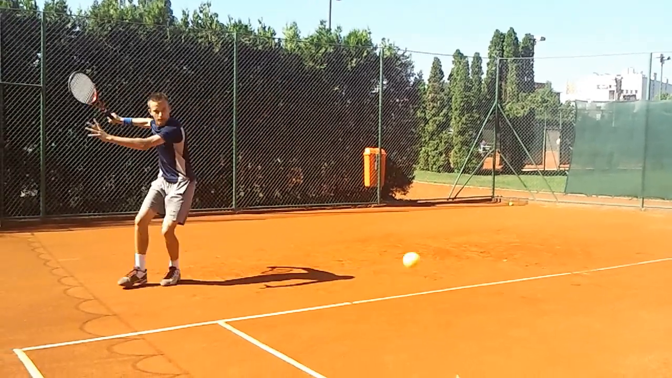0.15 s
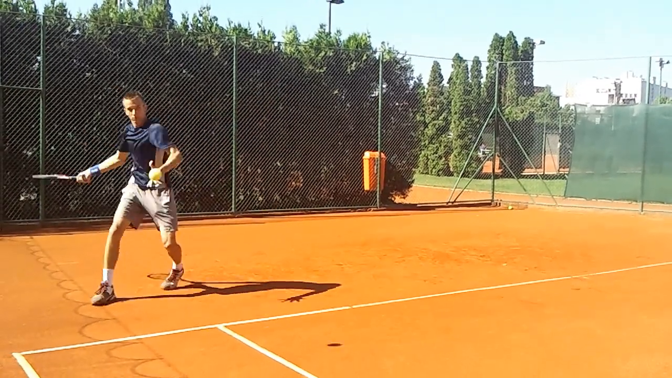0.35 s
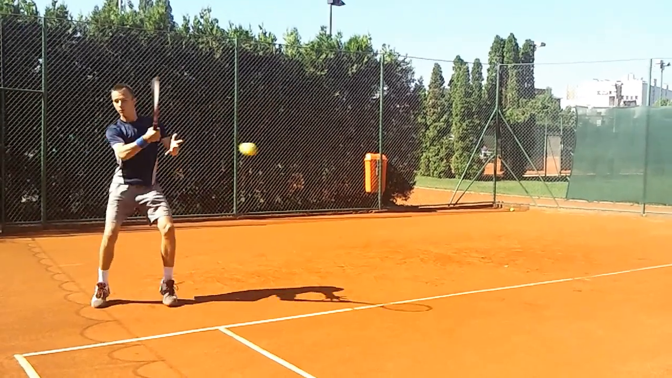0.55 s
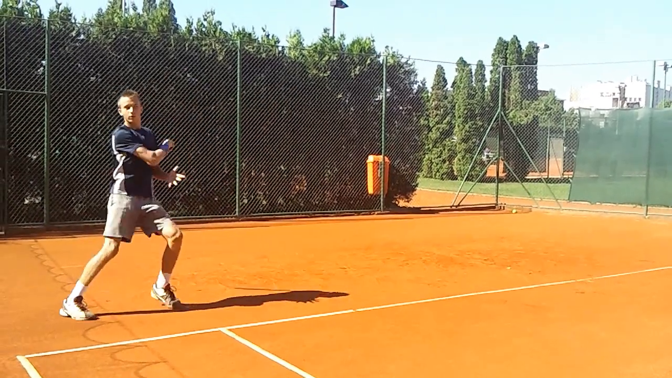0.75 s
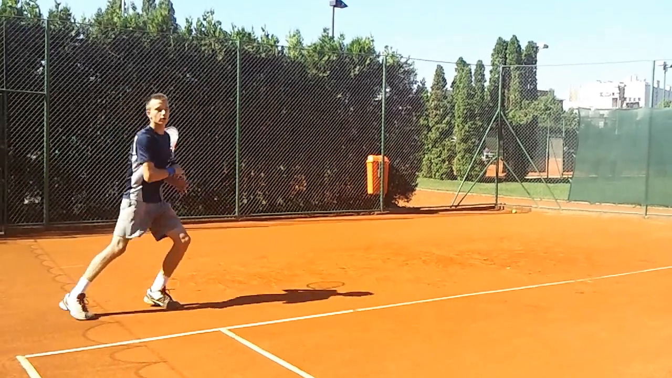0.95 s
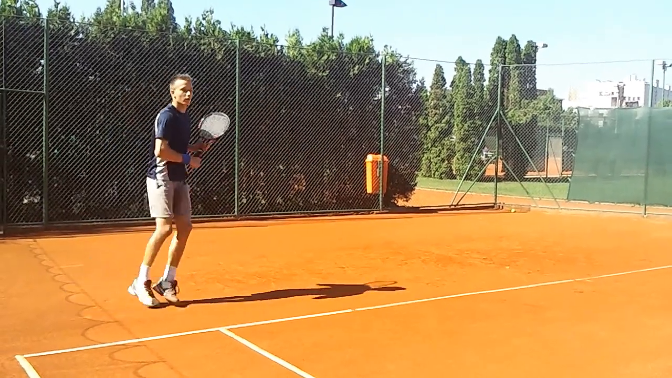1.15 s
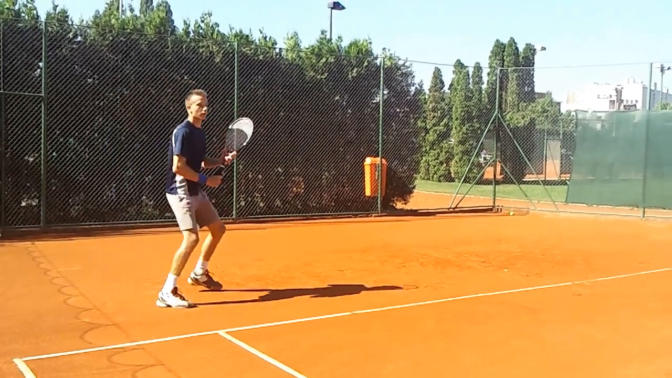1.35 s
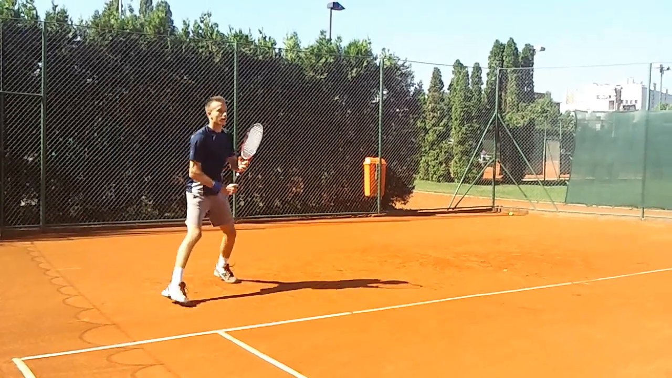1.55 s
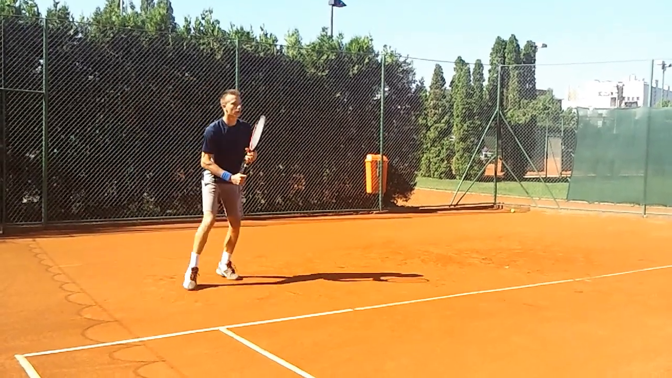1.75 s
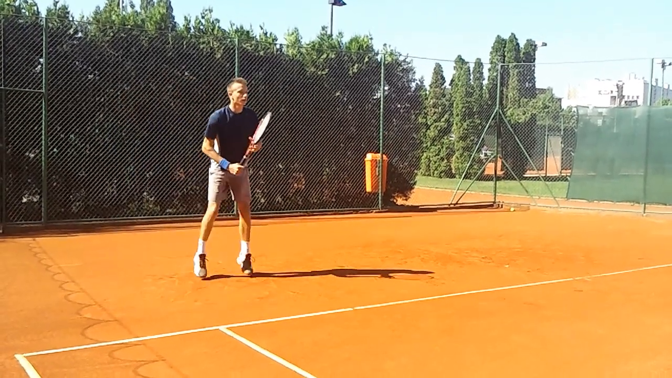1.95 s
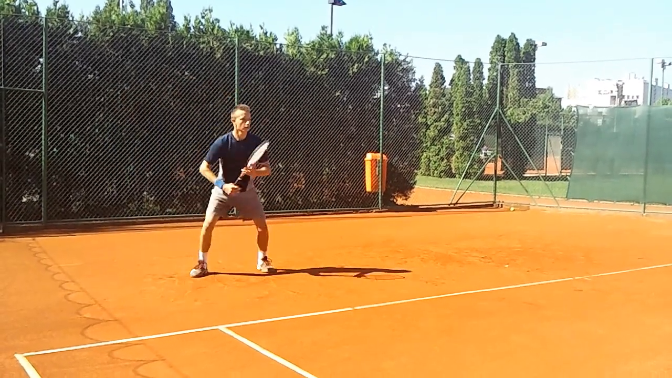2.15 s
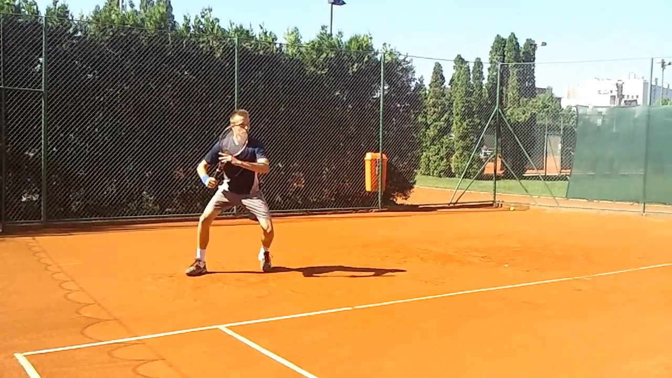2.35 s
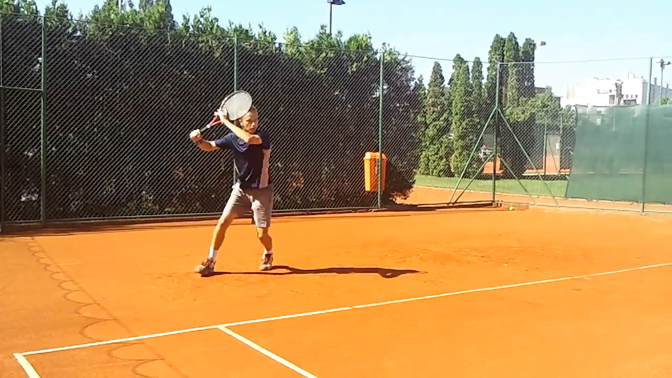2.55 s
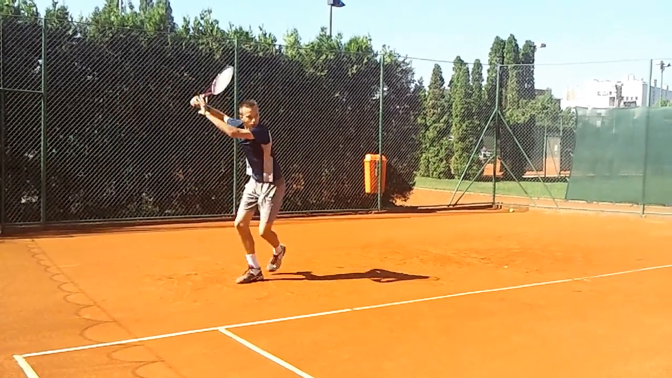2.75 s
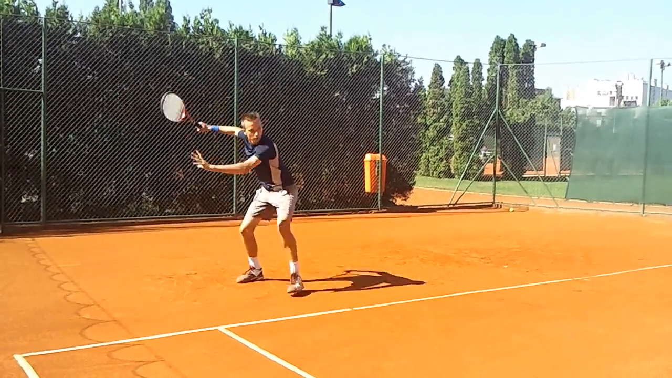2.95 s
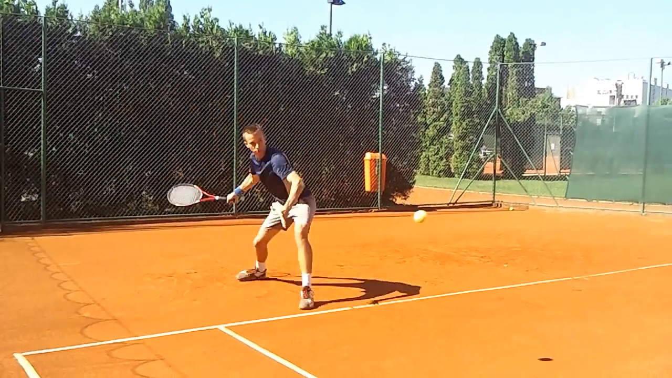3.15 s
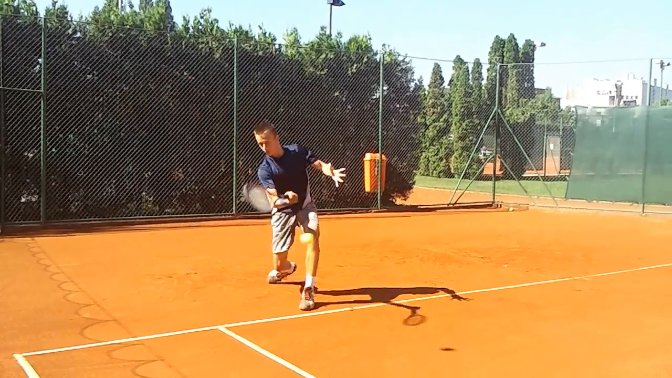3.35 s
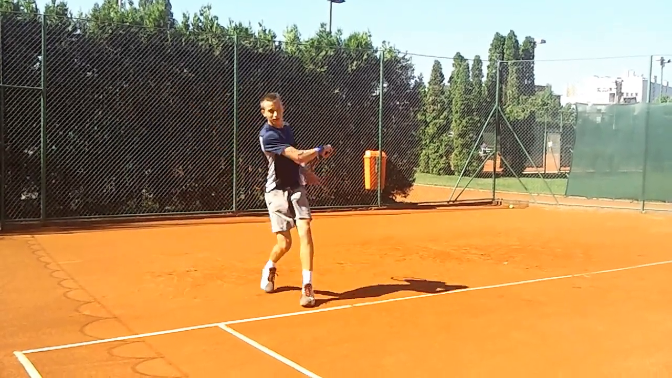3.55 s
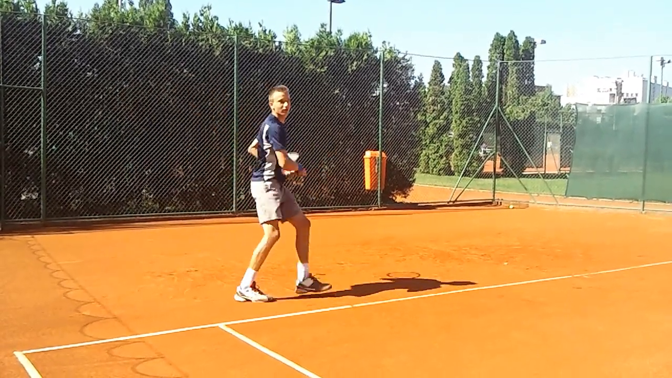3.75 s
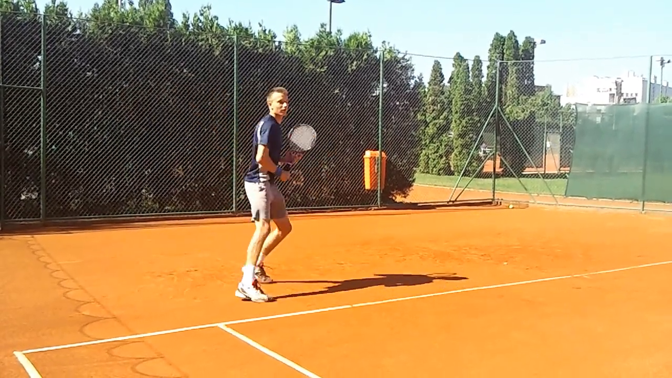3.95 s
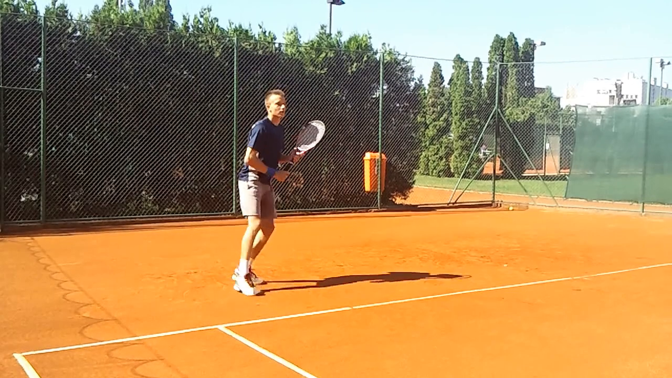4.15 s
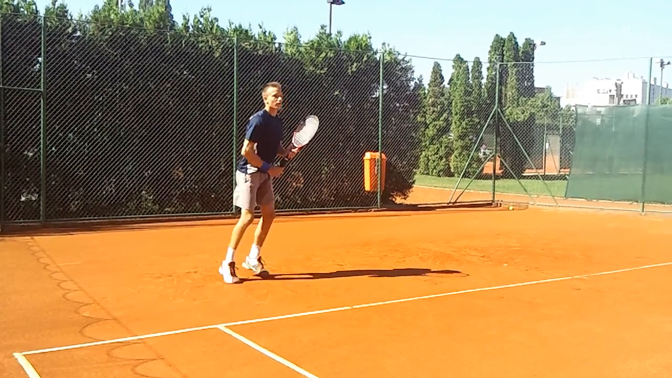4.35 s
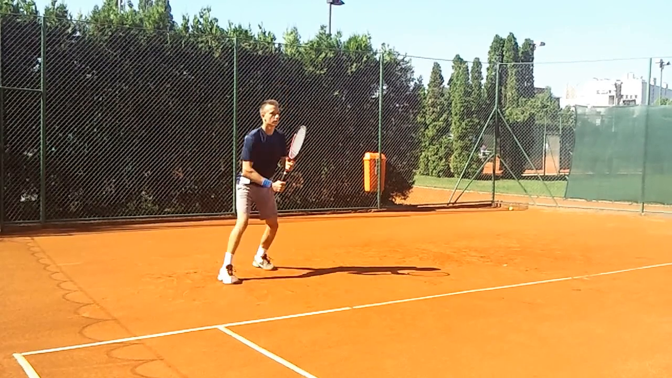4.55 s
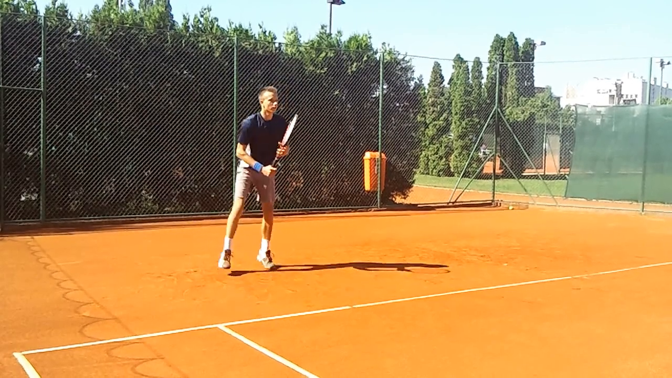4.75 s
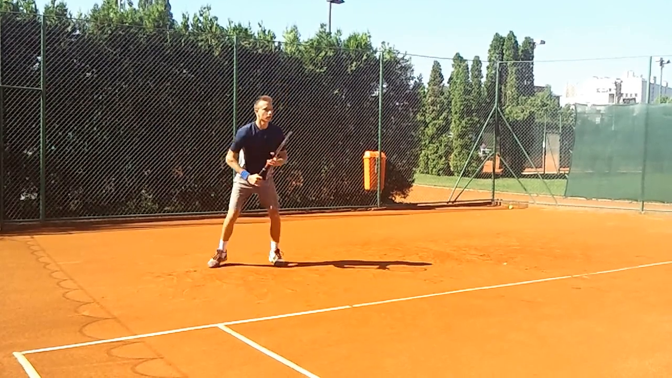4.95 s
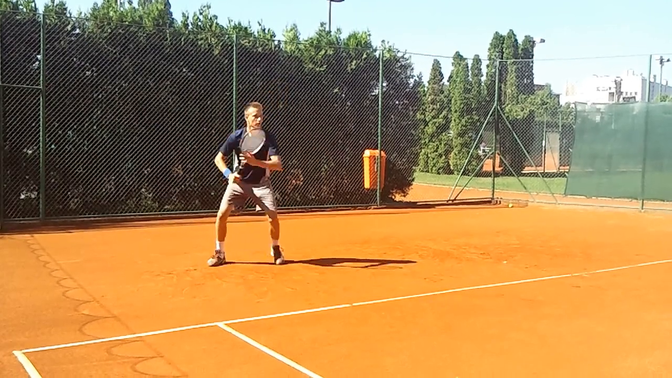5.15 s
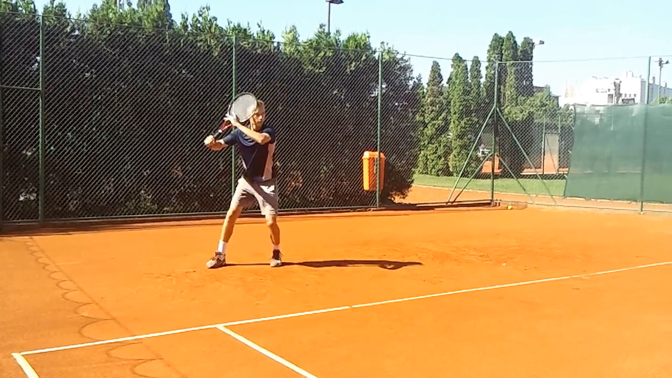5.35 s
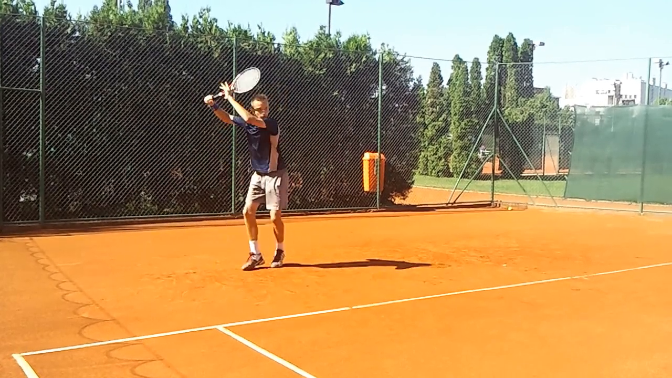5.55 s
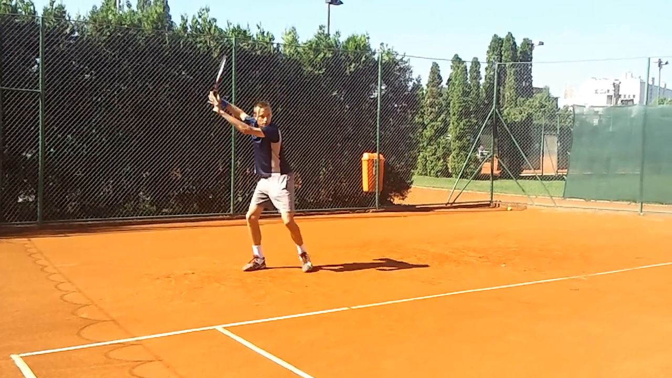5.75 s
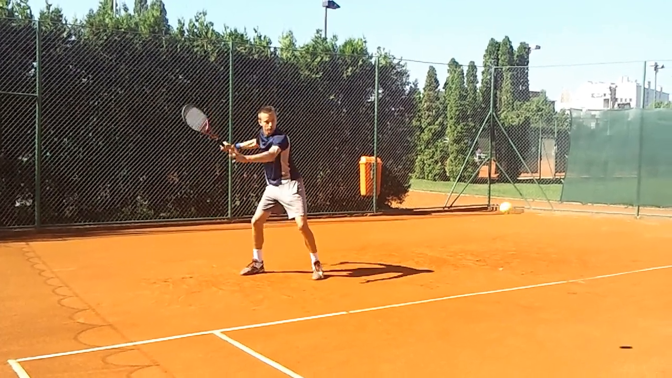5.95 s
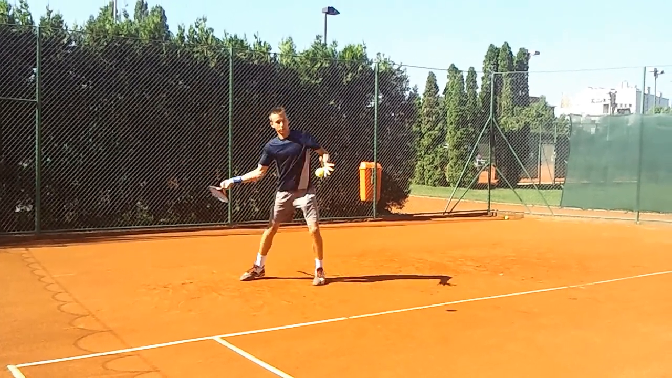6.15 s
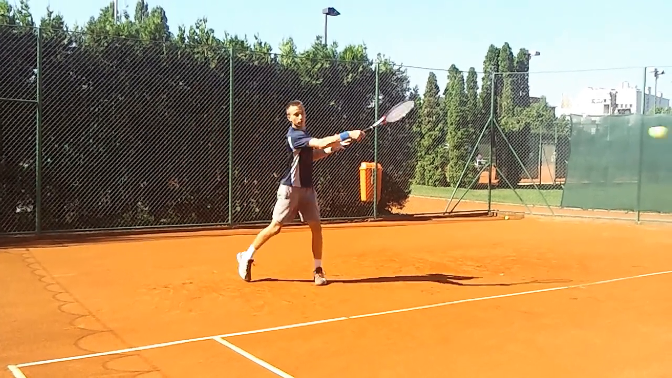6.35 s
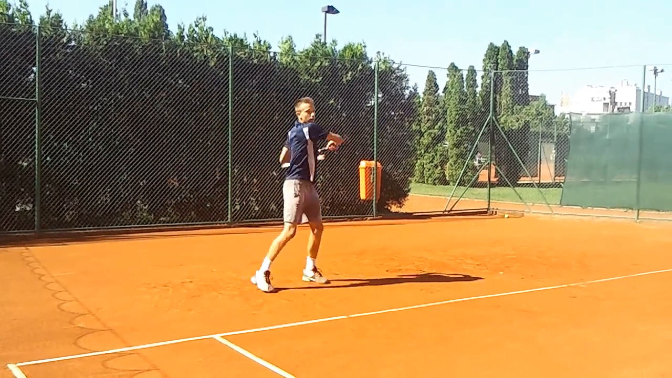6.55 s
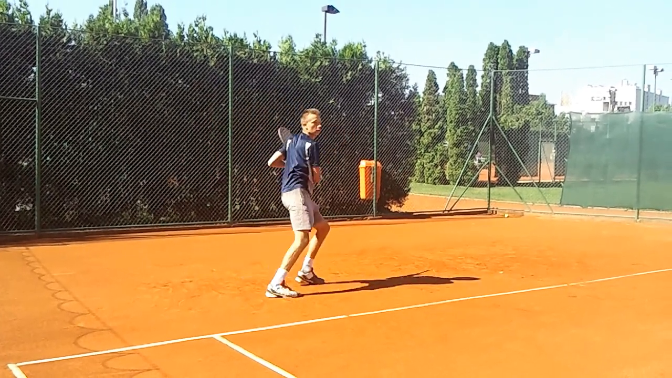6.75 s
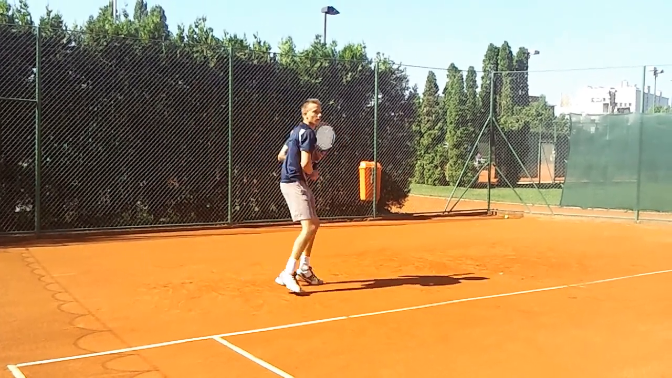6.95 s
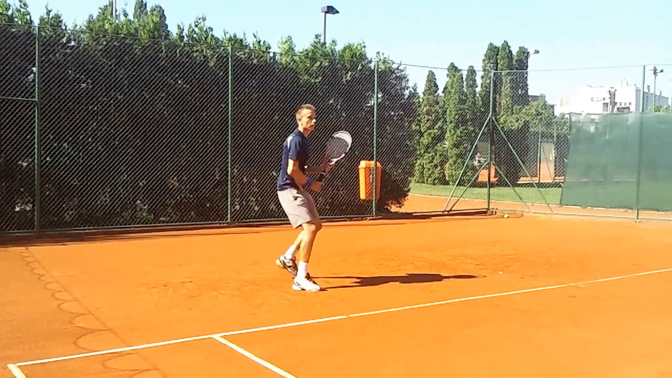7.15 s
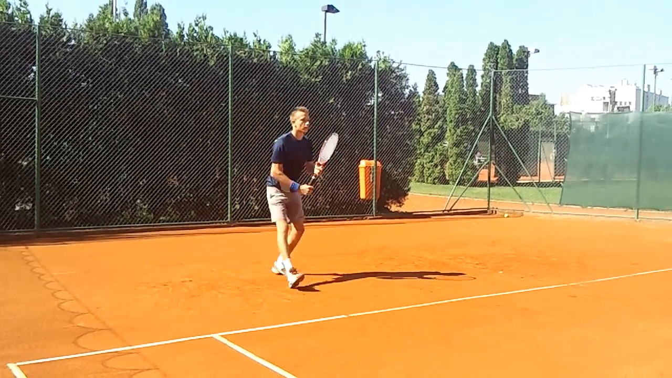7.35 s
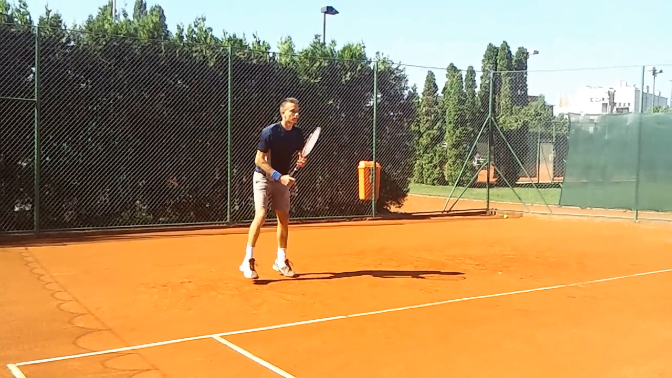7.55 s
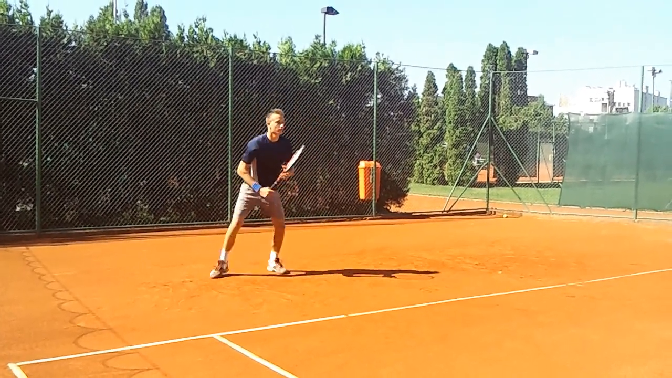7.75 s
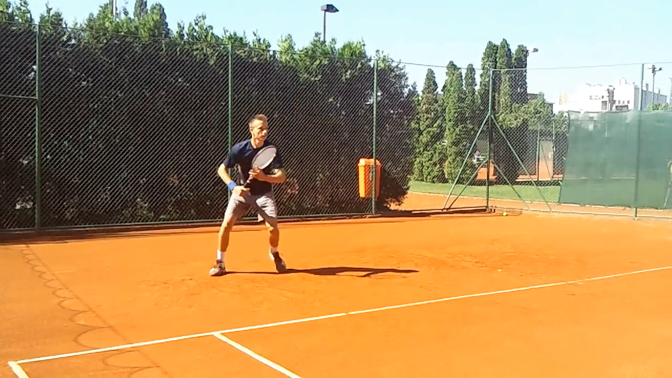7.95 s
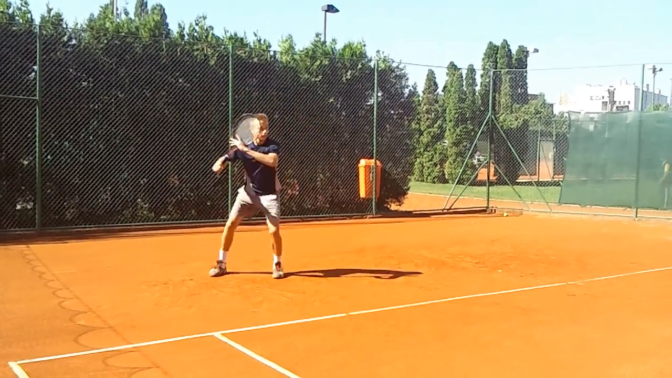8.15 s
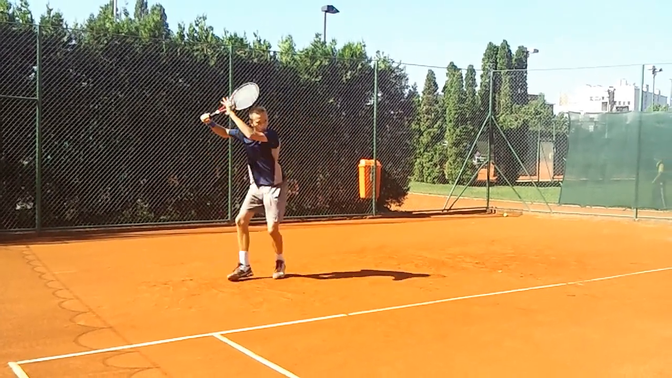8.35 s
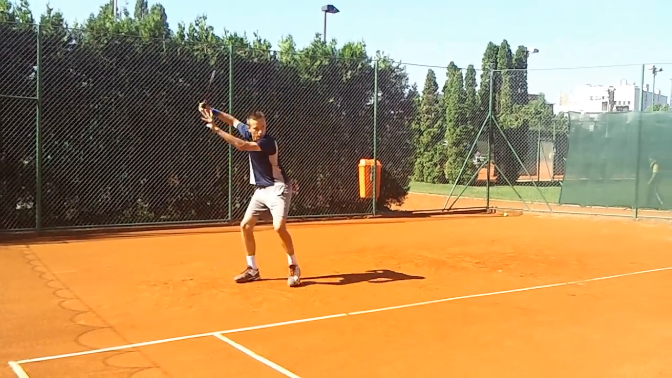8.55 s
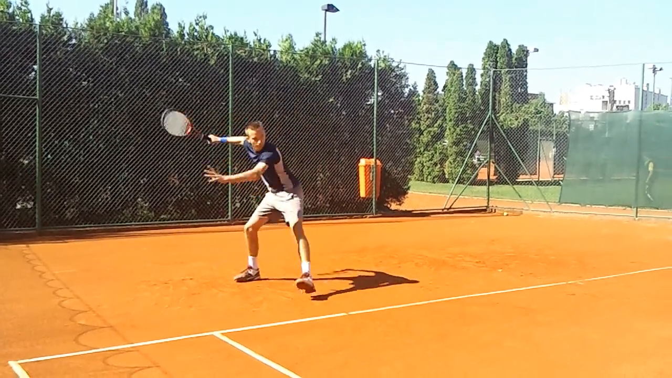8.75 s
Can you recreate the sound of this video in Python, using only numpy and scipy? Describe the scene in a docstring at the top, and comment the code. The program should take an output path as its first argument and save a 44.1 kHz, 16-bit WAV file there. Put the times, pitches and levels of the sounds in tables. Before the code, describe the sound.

Quiet open-air clay court. A low ball thud and gritty scuff come first, then a loud, hollow racket pock with fence echoes. Shoes shuffle and slide until a dull knock answers from the far side. This cycle repeats about every three seconds, with faint birds, distant airy hush and a few brief wind bumps. The small microphone sits near the close player, with thin bass and softened top.

```python
"""Faint air noise and a scuff of grit, then a low thud on clay: a tennis rally on an outdoor court.
Thuds, racket strokes and the duller far strokes are sums of decaying modes with a burst of coloured noise.
Shoes and wind are coloured noise under moving gains; birds are sines along wavering pitch tracks.
Fences and hedge answer as a convolution with discrete slaps and a diffuse tail."""
import sys
import numpy as np
from scipy import signal
from scipy.fft import rfft, irfft, next_fast_len
from scipy.io import wavfile
from scipy.ndimage import uniform_filter1d

SR = 44100
rng = np.random.default_rng(int(sys.argv[2]) if len(sys.argv) > 2 else 0)


def digitize_waveform(pressure):
    """Quantize a signal to 16-bit integers and store it at the path in sys.argv[1].

    Rows of a 2-D input are taken as channels; values are limited to [-1, 1].
    """
    field = np.atleast_2d(pressure).T
    bounded = np.clip(field, -1, 1)
    quanta = np.round(bounded * 32767).astype(np.int16)
    wavfile.write(sys.argv[1], SR, quanta)


N = 388521
TIME = np.arange(N) / SR
SINCE_CONTACT = TIME[:SR // 8]   # t/s

# All levels are relative to the gains they are combined with; spectra are power densities.
# Far traffic and leaves, spectrum: [f/Hz, level/dB]
AIR_SPECTRUM = [(30, -6), (100, -10.5), (170, -6), (280, 1.5), (380, -4.5), (650, -5.5), (1000, -5.5),
                (1600, -9.5), (2600, -17.5), (3600, -13), (5000, -16), (6800, -19), (8000, -30),
                (9200, -36), (10000, -55.5)]
AIR_DB, AIR_WAVER_DB = -56.2, 0.6
# Wind buffeting, spectrum: [f/Hz, level/dB]
WIND_SPECTRUM = [(20, -3), (45, 3), (100, -1.5), (170, -7), (300, -19), (600, -64)]
# Strength of the wind on the microphone: [t/s, level/dB]
WIND_STRENGTH = [(0, -60.5), (1.2, -60.5), (1.55, -57), (2.2, -62), (3.5, -61), (3.6, -53.5), (4.15, -54),
                 (4.7, -59.5), (6.53, -58), (6.63, -41), (6.74, -55), (7.18, -59), (7.36, -47), (7.6, -45),
                 (7.98, -59), (8.8, -60)]

# Longer scuffs and slides: [t/s at the height, half length/s, level/dB, weight on the foot/dB]
SCUFFS = [(0.052, .021, -54, -2), (0.598, .018, -55.5, 3), (0.888, .026, -46, 1.5), (1.446, .016, -55, 3),
          (1.835, .045, -56, 0), (2.06, .05, -58.5, 7), (2.899, .021, -50, -8), (3.198, .018, -44, -6),
          (3.497, .06, -49.5, -4), (3.823, .036, -48.5, 0), (4.16, .033, -53.5, -5), (4.345, .055, -51, -2),
          (4.514, .038, -49.5, -11), (4.68, .035, -51.5, -14), (5.722, .04, -54, -1), (6.667, .06, -59, 7),
          (6.808, .048, -47, -1), (7.323, .057, -52, 3.5), (8.566, .043, -53, -3)]
# Twist of the feet into each near stroke: [lead/s, half length/s, level/dB, weight/dB]
PIVOT = (.2, .055, -59.5, -3)
OWN_STROKE_ABOVE_DB = -15   # louder strokes are the near player's own
# Split step, a hop just after each far stroke: [delay/s, half length/s, level/dB, weight/dB]
SPLIT_STEP = (.207, .048, -53.5, -6)
# Light shuffling in between
SHUFFLES_PER_S, SHUFFLE_HALF_S, SHUFFLE_DB, SHUFFLE_WEIGHT_DB = 3, 0.08, -69, -1
# Loose grit, spectrum: [f/Hz, level/dB]
GRIT_SPECTRUM = [(500, -27), (1200, -16), (2100, -6.5), (2800, -10.5), (3400, 3.5), (5000, 1), (6700, 4),
                 (8000, -8.5), (9200, -14.5), (10200, -43)]
# A sole with weight on it, spectrum: [f/Hz, level/dB]
SCRAPE_SPECTRUM = [(200, -11.5), (500, -5), (1000, -3), (1500, -8), (2100, -9), (2800, -13), (4000, -11.5),
                   (8000, -47)]

# Ball bounces near and far, and the heaviest footfalls: [t/s, level/dB, grit and upper ring/dB]
THUDS = [(0.127, -22.5, -5), (1.333, -37.5, -7.5), (2.396, -39.5, -5), (2.459, -37, -2),
         (2.818, -27.5, -4.5), (3.12, -35, -11), (4.478, -41, -9), (4.847, -37, -20), (5.319, -36.5, -9),
         (5.8691, -26.5, -6), (6.113, -36, -9), (6.579, -34, -16), (7.25, -34, -9), (8.317, -38.5, -9),
         (8.6021, -28, -6.5)]
# Modes of a thud, the low push first: [f/Hz, level/dB, t60/s]
THUD_MODES = [(214, 2, 0.029), (620, 3, 0.0068), (1202, -2, 0.032), (1590, -23, .015)]
# Contact noise of clay and of the far strokes, spectrum: [f/Hz, level/dB]
DULL_CRACK_SPECTRUM = [(300, -7), (1100, 3), (2200, -6), (3000, -7), (4000, -11.5), (6800, -11),
                       (8000, -18.5), (10000, -42)]

# Slaps from fences and walls, near baseline: [delay/s, level/dB]
NEAR_ECHOES = [(0.0605, -23.5), (.1350, -25), (.1850, -27.5), (.2150, -31), (0.2600, -32)]
# Slaps for the far baseline: [delay/s, level/dB]
FAR_ECHOES = [(.0160, -16), (0.072, -21), (.1210, -23.5)]
# Sound scattered by hedge and fences, spectrum: [f/Hz, level/dB]
SCATTER_SPECTRUM = [(100, -1), (300, -5), (600, -7), (1100, -1.5), (2000, -1), (4000, 6), (9000, -12)]
TAIL_LUMP_DB = 3

# Faint rising chirps from the hedge; the rise is a share of the first pitch
CHIRPS_PER_S, CHIRP_S, CHIRP_HZ, CHIRP_RISE, CHIRP_DB = 1.2, 0.035, 3600, 0.2, -67
# The warbler's figure, up, down and up again: [t/s from its start, f/Hz]
WARBLE_FIGURE = [(0, 3900), (.018, 5500), (.042, 4000), (.072, 3450), (.102, 4200)]
# The figure sung whole or broken off: [t/s at the start, length/s, level/dB]
WARBLES = [(.353, .055, -60.5), (1.183, .102, -55.5), (1.384, .05, -58), (1.926, .045, -58.5),
           (2.766, .04, -60.5), (7.53, .035, -59.5)]
# A second bird's thin, sinking whistles: [t/s at the start, length/s, first f/Hz, level/dB]
WHISTLES = [(4.7, .22, 5200, -62.5), (8.748, .063, 6800, -57)]
WHISTLE_SAG = 0.06   # share of its pitch that a whistle loses
QUAVER = 0.13   # unsteadiness of a bird's instantaneous pitch, as a share

# Racket strokes, the weak ones from a court nearby:
# [t/s, level/dB, push/dB, string bed/dB, ball pock f/Hz, pock/dB, upper strings/dB, crack/dB]
STROKES = [(0.6764, -11.5, -3.5, 0.5, 1049, 2, -0.5, -6.5), (3.0699, -33.5, 7.5, -14, 1090, -3, 4.5, -5.5),
           (3.5138, -9, 2, -24, 967, 4, -11, -9), (6.3700, -50.5, -6, -15, 1300, -25, -21, 8.5),
           (6.4422, -11, 1, -3.5, 850, -3, 3.5, -7.5), (7.6244, -19, -0.5, -21, 1030, -4.5, -5, -17)]
# Racket modes, from push of the head through upper strings to zing: [f/Hz, level/dB, t60/s]
RACKET_MODES = [(215, 0.5, 0.018), (385, -2.5, 0.017), (756, -12, 0.019), (1300, -3.5, 0.018),
                (1790, -14, .024), (2106, -12.5, 0.026), (2560, -24.5, .03), (3204, -26, 0.037),
                (4660, -34.5, .03), (5010, -22, 0.034), (6880, -34, 0.029)]
STRING_BED_HZ, STRING_BED_T60_S, POCK_T60_S = 557, 0.012, 0.021
# The string bed swinging free once the ball has gone: [f/Hz, level/dB, t60/s]
AFTER_RING = (525, -19, .09)
# Contact noise on the strings, spectrum: [f/Hz, level/dB]
STRING_CRACK_SPECTRUM = [(300, -24), (900, 7.5), (1800, -3.5), (2800, -6), (3400, 2), (5000, -4.5),
                         (6800, -3.5), (8000, -14.5), (10000, -30.5)]

# The far player's strokes: [t/s, level/dB, crack/dB]
RETURNS = [(2.0510, -19.5, -16.5), (4.8900, -19, -18), (7.6820, -18.5, -17)]
# Racket modes that carry across the court: [f/Hz, level/dB, t60/s]
FAR_RACKET_MODES = [(226, -5, 0.038), (387.6, 2.5, 0.016), (569, -3.5, 0.03), (842, -8, 0.039),
                    (990, -2.5, 0.019), (2167, -17.5, 0.018)]

CUTOFF_HZ = 10100


def from_db(db):
    """A level is twenty times the logarithm of an amplitude ratio; this inverts it."""
    return 10 ** (np.asarray(db) / 20)


def noise(spectrum, size):
    """Shaping the spectrum of white noise colours it; the result has rms 1."""
    hz, db = np.transpose(spectrum)
    padded = next_fast_len(size)
    bins = np.maximum(np.fft.rfftfreq(padded, 1 / SR), 1)
    gain = from_db(np.interp(np.log(bins), np.log(hz), db))
    white = rng.standard_normal(padded)
    coloured = irfft(rfft(white) * gain, padded)[:size]
    return coloured / coloured.std()


def flutter(per_s, depth_db):
    """Random amplitude modulation: the gain moves in dB between per_s random values a second."""
    knots = rng.standard_normal(N // 20)
    return from_db(depth_db * np.interp(TIME * per_s, np.arange(len(knots)), knots))


def add(track, s, sound):
    """Superposition: a sound is summed into a track from s seconds."""
    start = int(round(s * SR))
    part = sound[:N - start]
    track[start:start + len(part)] += part


def swell(rise_s, t60):
    """Forced and free motion: growth during contact, then exponential decay by 60 dB in t60."""
    rise = np.sin(np.pi / 2 * np.minimum(SINCE_CONTACT / rise_s, 1)) ** 2
    decay = from_db(-60 * np.maximum(SINCE_CONTACT - rise_s, 0) / t60)
    return rise * decay


def ring(modes, rise_s):
    """Modal superposition: a struck body sounds as a sum of decaying cosines."""
    return sum(from_db(db) * swell(rise_s, t60) * np.cos(2 * np.pi * hz * SINCE_CONTACT)
               for hz, db, t60 in modes)


def bump(s, half_s):
    """A Gaussian contact envelope, smooth on both sides of s seconds."""
    return np.exp(-0.5 * np.minimum(((TIME - s) / half_s) ** 2, 100))


def scattered(per_s):
    """A jittered point process, one random moment per interval: rows (s, spread from -1 to 1)."""
    draws = rng.random((60, 2))
    rows = [((k + when) / per_s, 2 * spread - 1) for k, (when, spread) in enumerate(draws)]
    return [row for row in rows if row[0] < TIME[-1]]


def background():
    """Broadband ambience is nearly steady noise; wind on the microphone is gusting bass noise."""
    air = from_db(AIR_DB) * noise(AIR_SPECTRUM, N) * flutter(per_s=20, depth_db=AIR_WAVER_DB)
    strength = from_db(np.interp(TIME, *np.transpose(WIND_STRENGTH)))
    wind = strength * noise(WIND_SPECTRUM, N) * flutter(per_s=19, depth_db=2.5)
    return air + wind


def footwork():
    """Friction follows the play: slides, pivots, split steps and shuffles, in rows as in SCUFFS."""
    pivots = [(s - PIVOT[0], *PIVOT[1:]) for s, db, *_ in STROKES if db > OWN_STROKE_ABOVE_DB]
    hops = [(s + SPLIT_STEP[0], *SPLIT_STEP[1:]) for s, *_ in RETURNS]
    shuffles = [(s, SHUFFLE_HALF_S, SHUFFLE_DB + 3 * spread, SHUFFLE_WEIGHT_DB)
                for s, spread in scattered(SHUFFLES_PER_S)]
    return SCUFFS + pivots + hops + shuffles


def shoes():
    """Frictional noise: grains crunch under the soles, and weight adds a lower scrape."""
    grit_power = scrape_power = 0
    for s, half_s, db, weight_db in footwork():
        contact = from_db(db) * bump(s, half_s)
        # overlapping contacts are incoherent, so their powers add
        grit_power = grit_power + contact ** 2
        scrape_power = scrape_power + (from_db(weight_db) * contact) ** 2
    grit = np.sqrt(grit_power) * noise(GRIT_SPECTRUM, N) * flutter(per_s=1500, depth_db=1.5)
    scrape = np.sqrt(scrape_power) * noise(SCRAPE_SPECTRUM, N) * flutter(per_s=360, depth_db=3.0)
    return (grit + scrape) * flutter(per_s=71, depth_db=2.0)   # the sole catches and slips


def thuds():
    """Impact on clay: a low push of air, with a spit of grit and an upper ring that rise together."""
    out = np.zeros(N)
    push = ring(THUD_MODES[:1], rise_s=0.0005)
    upper = ring(THUD_MODES[1:], rise_s=0.00091)
    for s, db, grit_db in THUDS:
        grit = noise(DULL_CRACK_SPECTRUM, len(SINCE_CONTACT)) * swell(rise_s=0.00019, t60=0.027)
        add(out, s, from_db(db) * (push + from_db(grit_db) * (grit + upper)))
    return out


def court(x, echoes, scatter_db, t60):
    """Reflection as convolution: a diffuse decaying tail and a few slightly smeared slaps."""
    t = TIME[:SR]
    tail = noise(SCATTER_SPECTRUM, SR) * from_db(-60 * t / t60) * np.minimum(t / 0.0047, 1)
    response = from_db(scatter_db) * tail / np.sqrt(SR)
    # posts and trees make the tail lumpy
    response = response * flutter(per_s=130, depth_db=TAIL_LUMP_DB)[:SR]
    lowpass = signal.butter(1, 2600, fs=SR, output="sos")
    for delay, db in echoes:
        smear = noise(SCATTER_SPECTRUM, len(SINCE_CONTACT)) * from_db(-60 * SINCE_CONTACT / 0.072)
        impulse = SINCE_CONTACT == 0
        slap = signal.sosfilt(lowpass, impulse + 0.036 * smear)
        add(response, delay, from_db(db) * slap)
    return signal.fftconvolve(x, response)[:N]


def note(hz):
    """Frequency modulation: a sine follows a pitch track with random quaver, fading in and out."""
    along = np.linspace(0, 1, len(hz))
    quaver = 1 + QUAVER * rng.standard_normal(len(hz))
    fade = 2 * np.sqrt(along * (1 - along))
    return fade * np.sin(2 * np.pi * np.cumsum(hz * quaver) / SR)


def birds():
    """Near-sinusoidal song: chirps at random, a warbler's repeated figure, a second bird's whistles."""
    out = np.zeros(N)
    for s, spread in scattered(CHIRPS_PER_S):
        rise = np.linspace(1, 1 + CHIRP_RISE, int(CHIRP_S * SR))
        add(out, s, from_db(CHIRP_DB) * note(CHIRP_HZ * 1.15 ** spread * rise))
    corners = np.interp(SINCE_CONTACT, *np.transpose(WARBLE_FIGURE))
    figure = uniform_filter1d(corners, size=400)   # rounds the turns of pitch
    for s, length, db in WARBLES:
        add(out, s, from_db(db) * note(figure[:int(length * SR)]))
    for s, length, hz, db in WHISTLES:
        sag = np.linspace(1, 1 - WHISTLE_SAG, int(length * SR))
        add(out, s, from_db(db) * note(hz * sag))
    return out * flutter(per_s=150, depth_db=4.0)


def strokes():
    """Impact excites modes: felt cracks on strings; string bed and hollow ball ring as they part."""
    out = np.zeros(N)
    push = ring([m for m in RACKET_MODES if m[0] < 1000], rise_s=0.00051)
    strings = ring([m for m in RACKET_MODES if 1000 <= m[0] < 3000], rise_s=0.0051)
    zing = ring([m for m in RACKET_MODES if m[0] >= 3000], rise_s=0.009)
    for s, db, push_db, bed_db, pock_hz, pock_db, strings_db, crack_db in STROKES:
        frame = from_db(-4) * (zing + from_db(strings_db) * strings - from_db(push_db) * push)
        burst = noise(STRING_CRACK_SPECTRUM, len(SINCE_CONTACT)) * swell(rise_s=0.0017, t60=0.037)
        crack = from_db(crack_db) * burst
        bed_mode = (STRING_BED_HZ, bed_db, STRING_BED_T60_S)
        ball_mode = (pock_hz, pock_db, POCK_T60_S)
        pock = ring([bed_mode, ball_mode], rise_s=0.0037)
        pock = pock + from_db(bed_db) * ring([AFTER_RING], rise_s=0.0024)
        add(out, s, from_db(db) * (frame + crack))
        add(out, s + 0.00151, from_db(db) * pock)   # the rebound comes a moment after first touch
    # a racket is too small to radiate deep bass
    return signal.sosfilt(signal.butter(2, 130, "high", fs=SR, output="sos"), out)


def knock(crack_db):
    """Directional radiation: the broad, dull knock that a racket face throws down the court."""
    burst = noise(DULL_CRACK_SPECTRUM, len(SINCE_CONTACT)) * swell(rise_s=0.0027, t60=0.042)
    return from_db(-3) * ring(FAR_RACKET_MODES, rise_s=0.0039) + from_db(crack_db) * burst


def thrown():
    """Radiation toward the fences: each row of STROKES leaves as a dull knock, heard only in echo."""
    out = np.zeros(N)
    for s, db, *_ in STROKES:
        add(out, s, from_db(db) * knock(crack_db=-9.5))
    return out


def returns():
    """Radiation across the court: the far player's strokes arrive as dull knocks."""
    out = np.zeros(N)
    for s, db, crack_db in RETURNS:
        add(out, s, from_db(db) * knock(crack_db))
    return out


def scene():
    """Direct and reflected sound add: near sources are driest, birds wetter, far strokes wettest."""
    near, far, song = strokes() + thuds(), returns(), birds()
    dulled = signal.sosfilt(signal.butter(2, 1800, fs=SR, output="sos"), near)
    near_echo = court(thrown() + from_db(-6) * dulled, NEAR_ECHOES, scatter_db=-5.5, t60=0.9)
    far_echo = court(far + from_db(-3) * song, FAR_ECHOES, scatter_db=3.3, t60=0.81)
    return (background() + shoes() + near + near_echo + song + far + far_echo)[None]


def record(dry):
    """Band limitation: the small microphone thins the bass, and a steep filter cuts the top."""
    thin = signal.sosfilt(signal.butter(1, 25, "high", fs=SR, output="sos"), dry)
    return signal.sosfilt(signal.ellip(10, 0.3, 70, CUTOFF_HZ, fs=SR, output="sos"), thin)


dry = scene()
out = record(dry)
digitize_waveform(out)
```